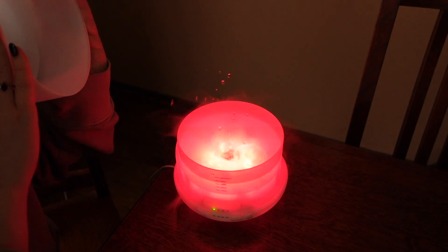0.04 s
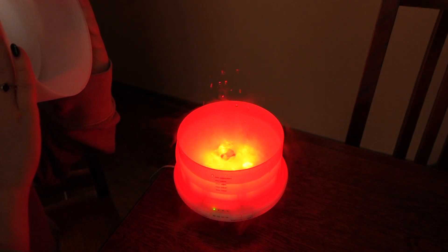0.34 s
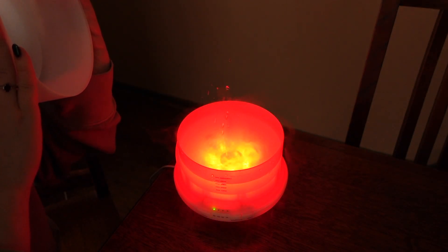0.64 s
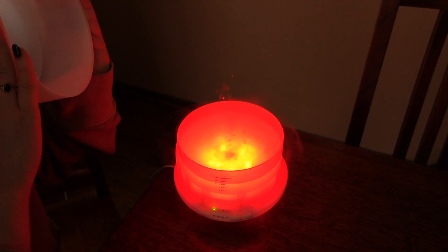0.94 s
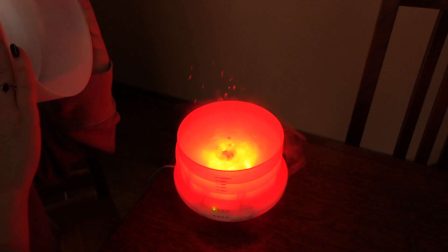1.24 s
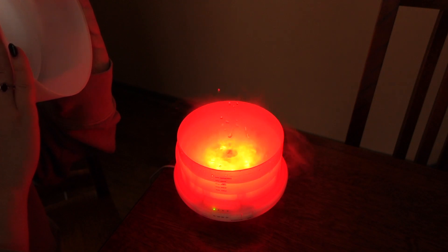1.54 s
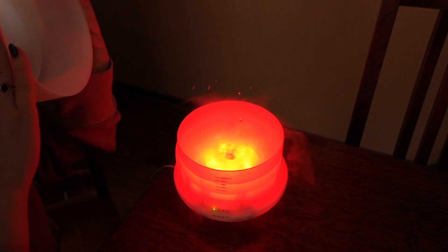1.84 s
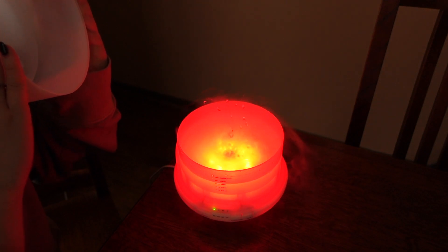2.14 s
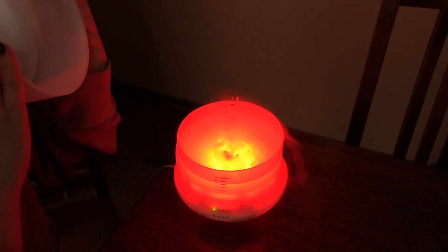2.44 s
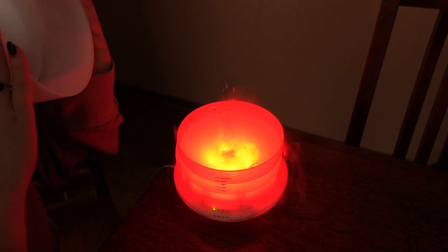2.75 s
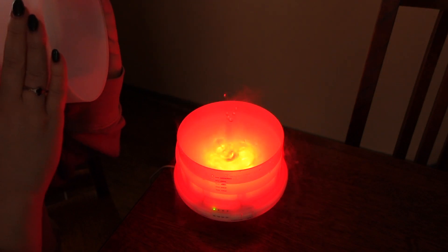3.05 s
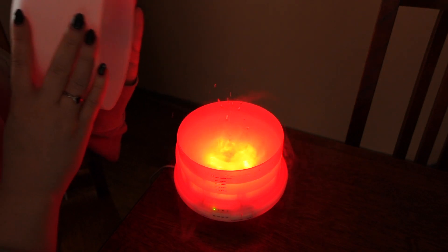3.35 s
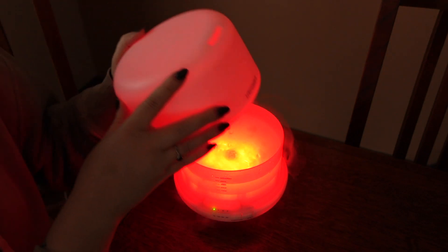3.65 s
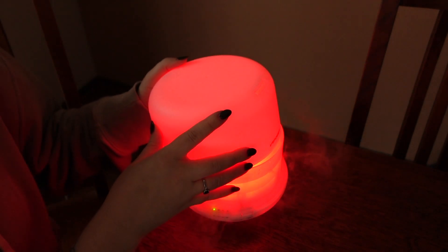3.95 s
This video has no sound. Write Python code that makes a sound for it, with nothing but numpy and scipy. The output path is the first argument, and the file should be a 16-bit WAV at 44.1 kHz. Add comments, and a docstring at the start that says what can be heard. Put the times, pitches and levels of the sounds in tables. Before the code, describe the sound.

A small diffuser runs throughout in a quiet room, with a soft fan hum, rushing air and a fine watery fizz. Faint droplets tick irregularly, one clearer at about 1 second. A sleeve swishes lightly around 3.4 to 3.7 seconds. At about 3.8 seconds the plastic lid lands with a much louder hollow knock, then rattles with a brief dull squeak until 4 seconds as the fizz dips.

```python
"""Ultrasonic diffuser and its lid

A small diffuser runs uncovered in a quiet room. Its fan hums and blows air through the housing;
the fountain fizzes and droplets tick back into the tank. A sleeve rustles as the plastic lid is
brought over. The lid knocks onto the rim, rings with the tank, and rattles and rubs into place."""
import sys
import numpy as np
from scipy import signal
from scipy.fft import rfft, irfft
from scipy.io import wavfile

SR = 44100
rng = np.random.default_rng(int(sys.argv[2]) if len(sys.argv) > 2 else 0)


def dump(signal):
    """Clip the signal to [-1, 1] and save it as 16-bit WAV at the path in sys.argv[1]."""
    limited = np.clip(np.atleast_2d(signal).T, -1, 1)
    pcm = np.round(limited * 32767).astype(np.int16)
    wavfile.write(sys.argv[1], SR, pcm)


N = 176400
TIME_S = np.arange(N) / SR

# Lid-on-rim contact noise spectrum: f/Hz, relative level/dB
CONTACT_SPECTRUM = [(60, -42), (250, -1), (800, 11), (3500, 4.5), (5000, -7), (7500, -13.5), (10000, -26),
                    (16000, -31)]


def from_db(db):
    """Decibels to gain."""
    return 10 ** (np.asarray(db) / 20)


def unit_rms(x):
    """Scale to rms 1."""
    return x / np.sqrt(np.mean(x ** 2) + 1e-20)


def pan(db):
    """Constant-power gains from a left-right level difference."""
    return unit_rms(from_db([[db / 2], [-db / 2]]))


def at_hz(points, hz):
    """Interpolate a table over log frequency."""
    f, value = np.transpose(points)
    return np.interp(np.log(hz + 1e-9), np.log(f), value)


def gain_curve(points):
    """Gain over time from rows of t/s, level/dB."""
    return from_db(np.interp(TIME_S, *np.transpose(points)))


def drift(rate_hz):
    """Low-passed random wander, rms about 1."""
    hop, warmup = 40, 2000
    r = np.exp(-2 * np.pi * rate_hz * hop / SR)
    slow = signal.lfilter([1], [1, -2 * r, r * r], rng.standard_normal(N // hop + warmup + 2))[warmup:]
    return np.interp(np.arange(N) / hop, np.arange(len(slow)), unit_rms(slow))


def stereo(mid, side, correlation):
    """Two channels of given correlation from independent signals."""
    return np.sqrt(1 + correlation) * mid + np.sqrt(1 - correlation) * side * np.array([[1], [-1]])


def noise(spectrum):
    """Coloured stereo noise, rms 1."""
    # Left-right likeness: f/Hz, correlation
    correlation = [(60, 1), (150, 0.39), (330, 0.44), (600, 0.12), (1200, 0.11), (1900, 0.41), (3500, 0.31),
                   (7000, 0.34), (14000, 0.69)]
    hz = np.fft.rfftfreq(N, 1 / SR)
    mid, side = rfft(rng.standard_normal((2, N)))
    white = stereo(mid, side, at_hz(correlation, hz))
    return unit_rms(irfft(white * from_db(at_hz(spectrum, hz)), N))


def lowpass(x, hz):
    """Third-order low-pass."""
    return signal.sosfilt(signal.butter(3, hz, fs=SR, output="sos"), x)


def resonate(x, hz, width_hz):
    """Two-pole band-pass, peak gain 1."""
    r, w = np.exp(-np.pi * width_hz / SR), 2 * np.pi * hz / SR
    return signal.lfilter(np.array([1, 0, -1]) * (1 - r * r) / 2, [1, -2 * r * np.cos(w), r * r], x)


def ring(clicks, hz, t60_s):
    """Each click starts a decaying sine of its own height."""
    r, w = np.exp(-np.log(1000) / (t60_s * SR)), 2 * np.pi * hz / SR
    return signal.lfilter([0, np.sin(w)], [1, -2 * r * np.cos(w), r * r], clicks + 1e-18)


def clicks_at(t_s, db):
    """Impulses at given times and levels."""
    out = np.zeros(N)
    out[(np.asarray(t_s) * SR).astype(int)] = from_db(db)
    return out


def decay(clicks, tau_s):
    """Each click starts an exponential envelope."""
    return signal.lfilter([1], [1, -np.exp(-1 / (tau_s * SR))], clicks + 1e-18)


def room(x, t60_s=0.27, gap_s=0.0048):
    """Diffuse reflections of a small furnished room, different at each ear."""
    t = TIME_S[:SR // 2]
    tail = rng.standard_normal((2, len(t))) * np.exp(-np.log(1000) * t / t60_s) * (t > gap_s)
    return signal.fftconvolve(x[None], unit_rms(tail) / np.sqrt(len(t)), axes=1)[:, :N]


def fan(rotor_hz=54.63, wander_hz=0.024, flutter_db=1.5, mains_hz=120, mains_db=-71):
    """Rotor harmonics over a faint mains hum."""
    # Fan tones: rotor multiple (rounded below), level/dB, left-right/dB
    tones = [(4, -69, 5), (8, -48, 0.5), (12, -64, -14), (16, -80, -17), (20, -66, 21), (24, -54.5, -1),
             (31, -82, 15), (32, -80, 37), (33, -62, 42), (36, -69, -6), (44, -81.5, 4), (48, -70.5, -12),
             (66.7, -82, 31), (69.9, -73, -4)]
    # The lid shades the whine: t/s, level/dB
    whine_shade = [(3.5, 0), (3.72, -4.5)]
    whine_above_hz = 1000
    turns = np.cumsum(rotor_hz + wander_hz * drift(1.61)) / SR
    out = from_db(mains_db) * np.sin(2 * np.pi * mains_hz * TIME_S)
    for multiple, db, pan_db in tones:
        k = round(multiple)
        tone = from_db(db + flutter_db * drift(2.6)) * np.sin(2 * np.pi * (k * turns + rng.random()))
        if k * rotor_hz > whine_above_hz:
            tone *= gain_curve(whine_shade)
        out = out + pan(pan_db) * tone
    return np.sqrt(2) * out


def airflow(rush_db=-50):
    """Broad rush of air and the housing resonances it excites."""
    # Air through the housing: f/Hz, relative level/dB
    rush_spectrum = [(25, -76), (50, -37.5), (85, -15.5), (112, -9), (150, -8), (260, -4.5), (460, 3),
                     (570, -5.5), (730, -3.5), (900, -8), (1500, -11), (2100, -6), (2500, -15.5),
                     (3500, -15), (5000, -26), (16000, -63.5)]
    # Housing resonances: f/Hz, width/Hz, level/dB, left-right/dB, correlation
    housing_modes = [(323.8, 12.4, -53.5, 2, 1), (338.5, 25, -53, -4, 0.77), (665, 51, -60.5, -67, 1),
                     (1266, 160, -53, 29, 0), (1642, 55, -61, 2, 1), (1766, 104, -55, 2.5, 0.78)]
    out = from_db(rush_db) * noise(rush_spectrum)
    for hz, width_hz, db, pan_db, correlation in housing_modes:
        air = stereo(*rng.standard_normal((2, N)), correlation)
        mode = resonate(resonate(air, hz, width_hz), hz, hz / 2)
        out += from_db(db) * pan(pan_db) * unit_rms(mode)
    return out


def fountain(fizz_db=-61, impacts_per_s=5000, spread_db=3.5, surge_db=2.8):
    """Smooth fizz, and surges of tiny spray impacts ringing in the tank."""
    # Fizz: f/Hz, relative level/dB
    fizz_spectrum = [(1500, -3), (3000, -17), (4500, 6.5), (6000, 3), (9000, 1), (11000, 1.5), (12500, 0.5),
                     (14000, -2), (16000, -2.5)]
    # Tank resonances: f/Hz, width/Hz, level/dB, relative surge depth
    tank_modes = [(2640, 28, -73, 1.1), (3710, 160, -69, 1.7), (6000, 150, -72, 0.96),
                  (6620, 160, -77, 1.1), (7620, 250, -98, 1), (8440, 230, -77, 1), (10530, 230, -69.5, 2.3)]
    # Spray strength: t/s, level/dB
    vigour = [(0, 0.5), (1.7, 0), (2.6, -2), (3.7, 1.5)]
    # The lid covers the fountain: t/s, level/dB
    lid_shade = [(3.78, -1), (3.92, -4)]
    out = from_db(fizz_db) * noise(fizz_spectrum)
    for hz, width_hz, db, depth in tank_modes:
        impacts = (rng.random((2, N)) < impacts_per_s / SR) * rng.choice([-1, 1], (2, N))
        sizes = from_db(spread_db * rng.exponential(1, (2, N)))
        surge = from_db(depth * surge_db * np.tanh(drift(23)))
        spray = stereo(*(impacts * sizes), correlation=0.46) * surge
        out += from_db(db) * unit_rms(resonate(spray, hz, width_hz)) * gain_curve(vigour)
    return out * gain_curve(lid_shade)


def droplets(echo_s=0.0114, echo_db=-13, bubble_cycles=38, top_hz=11800, room_db=-3):
    """Each drop clicks, splashes and leaves a briefly ringing bubble; a nearby wall echoes it."""
    # Drops into the tank: t/s, excitation level/dB, bubble f/Hz
    drops = [(.2952, -37.5, 8850), (1.019, -31, 6960), (1.0720, -39.5, 2740), (1.2623, -36.5, 7900),
             (1.2705, -46, 12000), (1.5658, -36.5, 9540), (1.9104, -47, 11600), (1.933, -41, 9500),
             (2.4775, -37.5, 8400), (2.5507, -36, 9060), (2.7477, -37.5, 7700), (2.863, -38.5, 2410),
             (3.249, -39, 11800), (3.5922, -40.5, 10400), (3.6994, -39, 10500)]
    out = np.zeros(N)
    for t_s, db, hz in drops:
        hit = clicks_at([t_s, t_s + echo_s], [db, db + echo_db])
        click = from_db(-2) * ring(hit, 1.15 * hz, t60_s=5 / hz)
        splash = lowpass(decay(hit, tau_s=0.001) * rng.standard_normal(N), hz + 2400)
        bubble = from_db(1) * ring(hit, hz, t60_s=bubble_cycles / hz)
        highpass = signal.butter(8, 0.92 * hz, "high", fs=SR, output="sos")
        out += signal.sosfilt(highpass, click + splash + bubble)
    out = lowpass(out, top_hz)
    return out + from_db(room_db) * room(out)


def sleeve():
    """Cloth swishes as the arm brings the lid over."""
    # Gaussian strokes: centre t/s, sigma/s, level/dB
    strokes = [(2.28, 0.095, -64), (3.41, 0.062, -55.5), (3.55, 0.035, -55.5), (3.69, 0.038, -53.5),
               (3.785, 0.013, -58.5)]
    # Cloth rustle: f/Hz, relative level/dB
    cloth_spectrum = [(300, -23), (1500, -6), (3500, 5.5), (5500, 0), (8500, -2.5), (11000, -12),
                      (16000, -22)]
    effort = sum(from_db(db) * np.exp(-((TIME_S - t_s) / sigma_s) ** 2 / 2)
                 for t_s, sigma_s, db in strokes)
    return effort * noise(cloth_spectrum)


def rim_slide(jitter_hz=14, scrape_db=-18):
    """Rim rubs on rim: a falling stick-slip tone with a little scrape."""
    # Dull squeak: t/s, f/Hz, level/dB
    squeak = [(3.897, 572.3, -54), (3.911, 533.5, -26), (3.926, 522, -25), (3.938, 464, -50),
              (3.95, 432, -22.5), (3.966, 434, -47)]
    t_s, hz, db = np.transpose(squeak)
    force = from_db(np.interp(TIME_S, t_s, db)) * (TIME_S > t_s[0]) * (TIME_S < t_s[-1])
    cycles = np.cumsum(np.interp(TIME_S, t_s, hz) + jitter_hz * drift(67.8)) / SR
    return force * (np.sin(2 * np.pi * cycles) + from_db(scrape_db) * noise(CONTACT_SPECTRUM))


def struck_mode(t_s, force_db, hz, t60_s, spread_db=1.0):
    """One mode, hit a little differently each time, radiating in a band around its pitch."""
    hits = clicks_at(t_s, force_db + spread_db * rng.standard_normal(len(t_s)))
    return resonate(ring(hits, hz, t60_s), hz, width_hz=0.45 * hz)


def lid_knocks(chatter_per_s=900, body_room_db=-19, shell_room_db=-6, top_hz=7300):
    """Each contact thumps the hollow body, clacks the thin plastic shell and sets the rim chattering."""
    # Lid meets rim: t/s, thump level/dB, clack level/dB
    knocks = [(3.8363, -15.5, -22.5), (3.8480, -51, -44), (3.8655, -23.5, -34), (3.879, -21, -32.5),
              (3.906, -28, -36.5), (3.932, -24, -38), (3.943, -22, -27.5), (3.958, -36, -40),
              (3.977, -29.5, -50)]
    # Hollow modes of lid and tank: f/Hz, relative level/dB, t60/s
    body_modes = [(120, -21, 0.35), (262, -42, 0.05), (316.2, 2, 0.16), (325, -35, 0.043),
                  (464.2, -3.5, 0.091), (549, -7, 0.064), (645, -18.5, 0.09)]
    # Plastic shell modes: f/Hz, relative level/dB, t60/s
    shell_modes = [(848, -19.5, 0.12), (1076, -23, .06), (1360, -18, 0.026), (1738, -10, 0.032),
                   (1830, -28, 0.027), (2267, -3.5, 0.024), (2322, -10, 0.014), (2640, -14.5, 0.015),
                   (3286, -4.5, 0.02), (3410, -7.5, 0.013), (3780, -18, 0.022), (4750, -25, 0.012),
                   (5400, -18, 0.0098)]
    t_s, thump_db, clack_db = np.transpose(knocks)
    body = sum(struck_mode(t_s, thump_db + db, hz, t60_s) for hz, db, t60_s in body_modes)
    shell = sum((-1) ** k * struck_mode(t_s, clack_db + db, hz, t60_s)
                for k, (hz, db, t60_s) in enumerate(shell_modes))
    contacts = clicks_at(t_s, clack_db)
    chatter = unit_rms(decay(rng.random(N) < chatter_per_s / SR, tau_s=0.001))
    crack = from_db(-6) * decay(contacts, tau_s=0.002)
    rattle = from_db(-18) * decay(contacts, tau_s=0.025) * chatter
    contact_noise = (crack + rattle) * noise(CONTACT_SPECTRUM)
    reverb = from_db(body_room_db) * room(body) + from_db(shell_room_db) * room(shell + contact_noise[0])
    return lowpass(body + shell + contact_noise + reverb, top_hz)


def scene():
    """The running diffuser, then the lid."""
    return fan() + airflow() + fountain() + droplets() + sleeve() + rim_slide() + lid_knocks()


def record(dry):
    """Steep treble cut."""
    cutoff_hz = 15750
    return signal.sosfilt(signal.ellip(12, 0.1, 80, cutoff_hz, fs=SR, output="sos"), dry)


dry = scene()
out = record(dry)
dump(out)
```